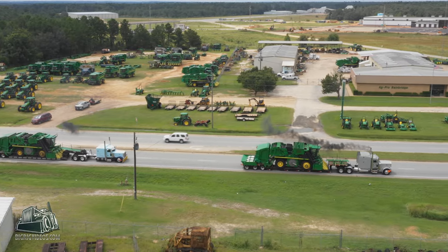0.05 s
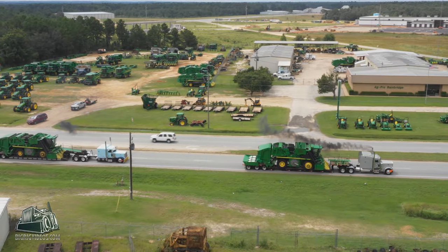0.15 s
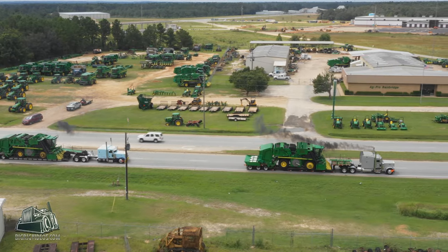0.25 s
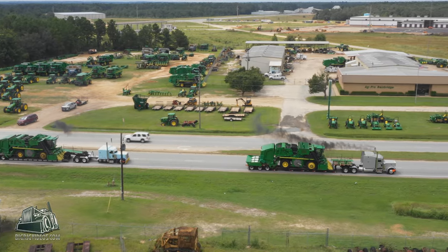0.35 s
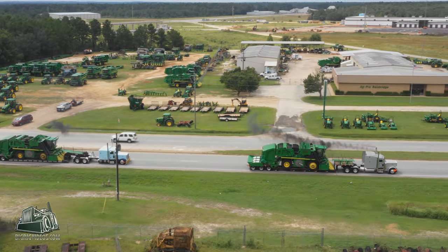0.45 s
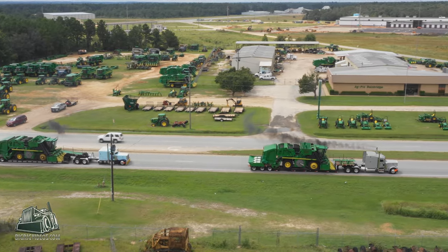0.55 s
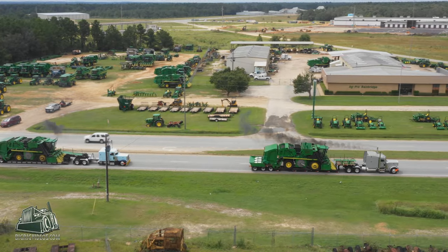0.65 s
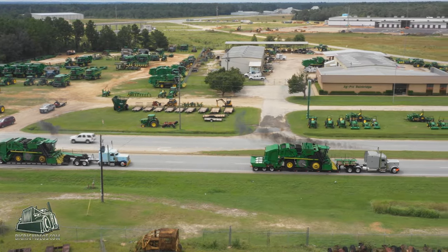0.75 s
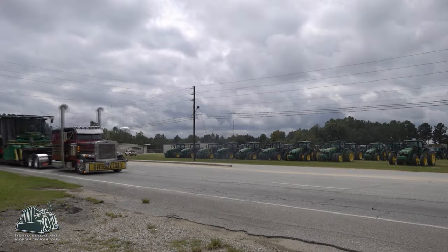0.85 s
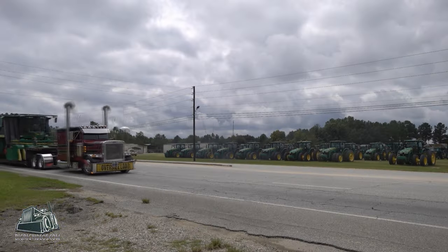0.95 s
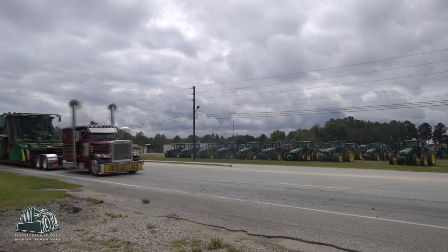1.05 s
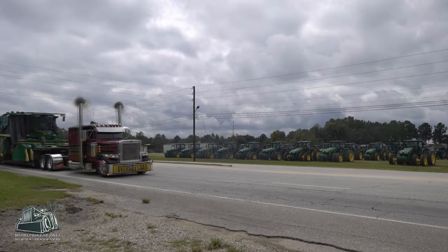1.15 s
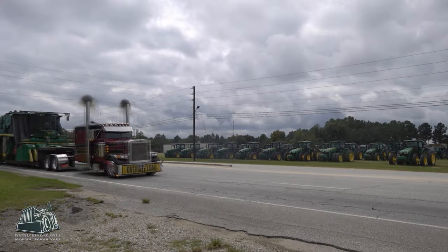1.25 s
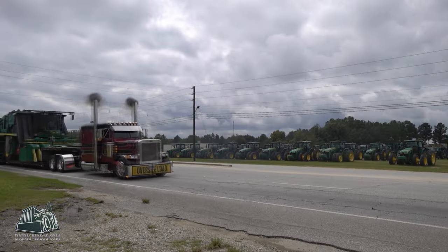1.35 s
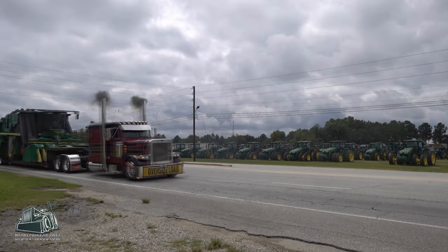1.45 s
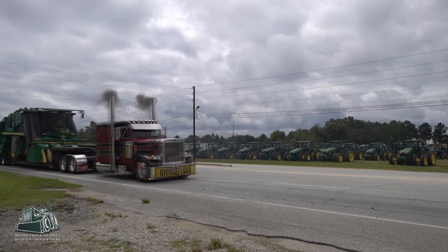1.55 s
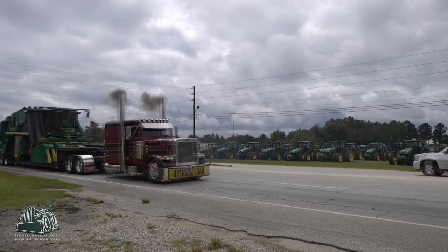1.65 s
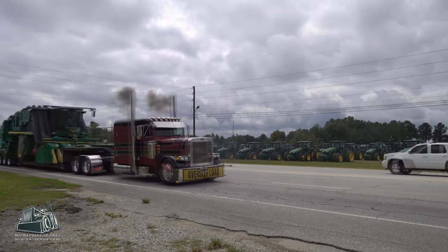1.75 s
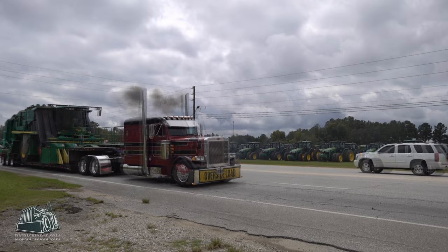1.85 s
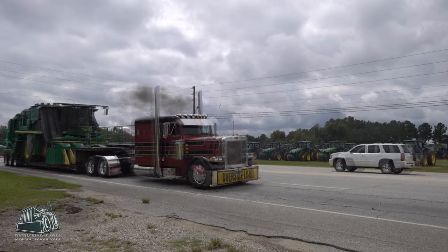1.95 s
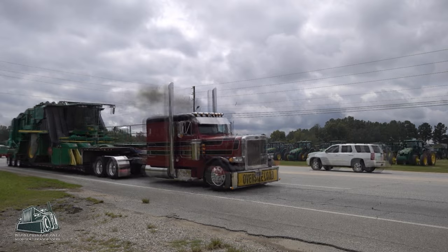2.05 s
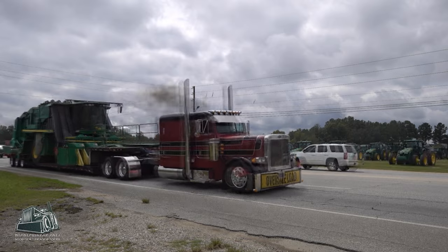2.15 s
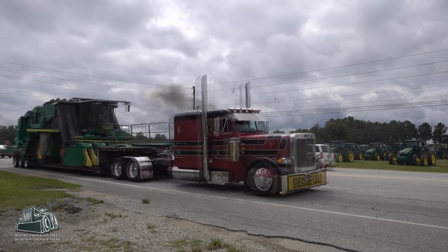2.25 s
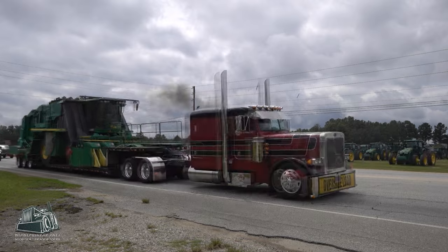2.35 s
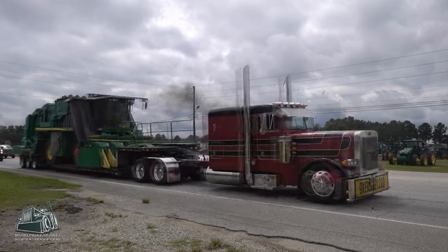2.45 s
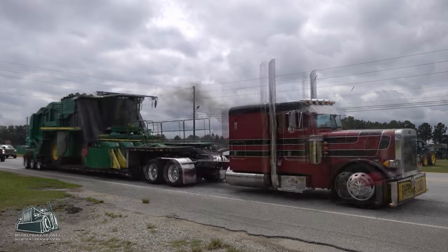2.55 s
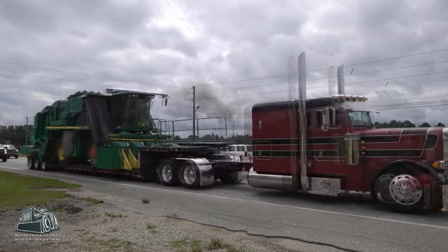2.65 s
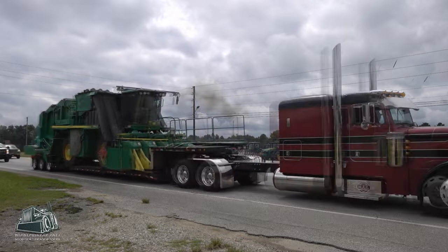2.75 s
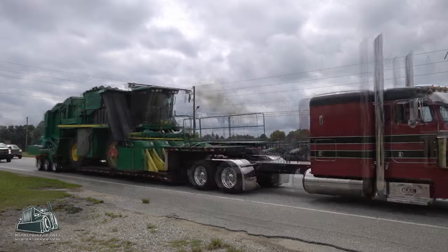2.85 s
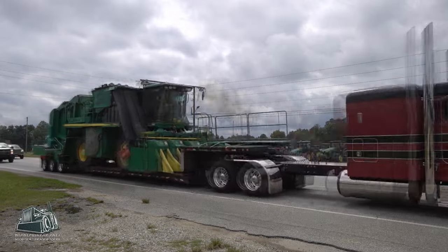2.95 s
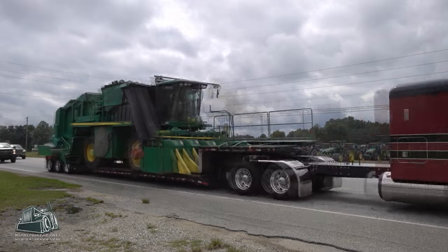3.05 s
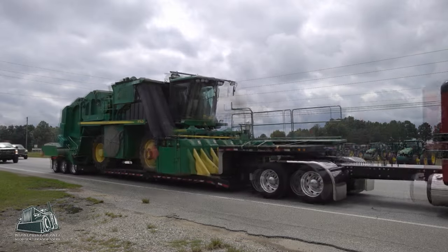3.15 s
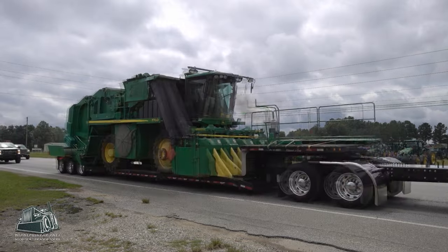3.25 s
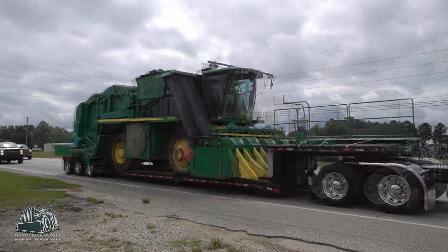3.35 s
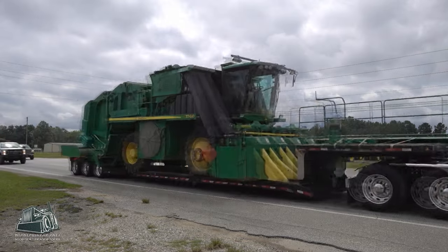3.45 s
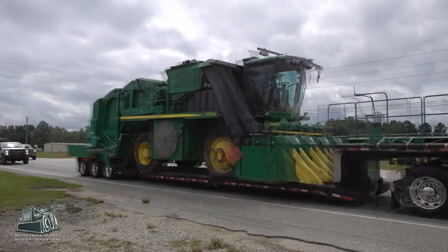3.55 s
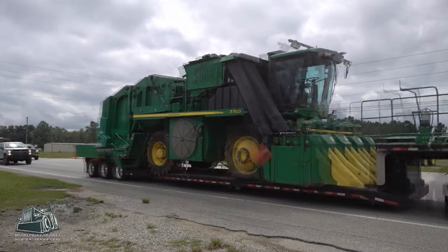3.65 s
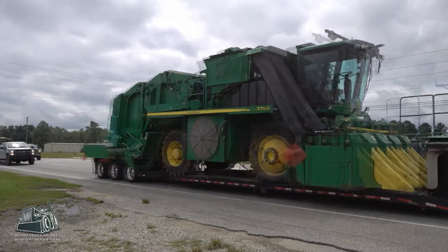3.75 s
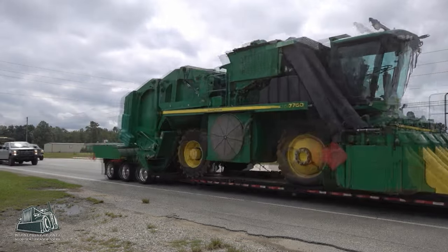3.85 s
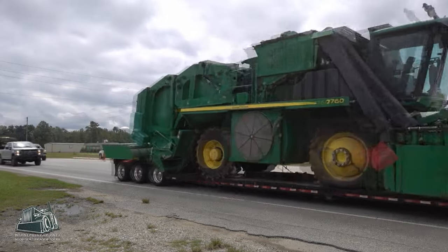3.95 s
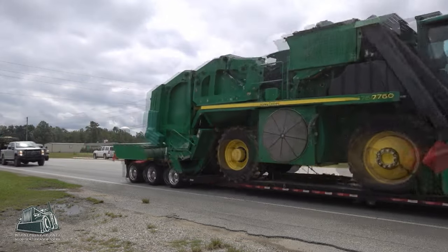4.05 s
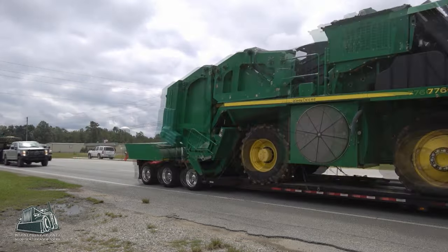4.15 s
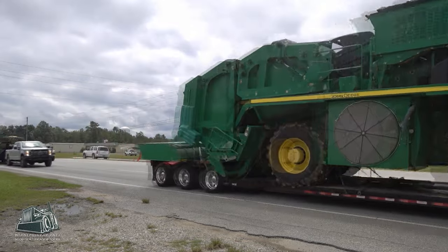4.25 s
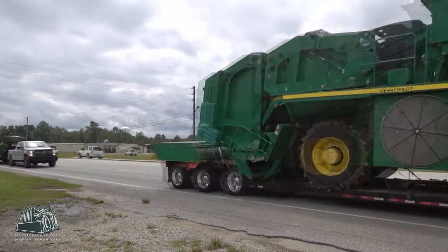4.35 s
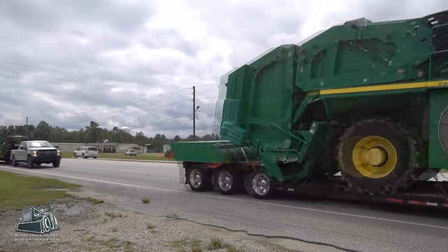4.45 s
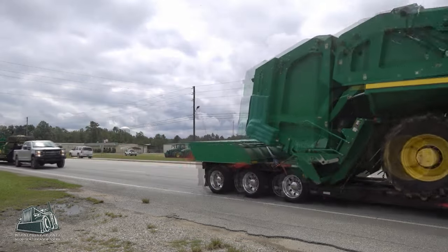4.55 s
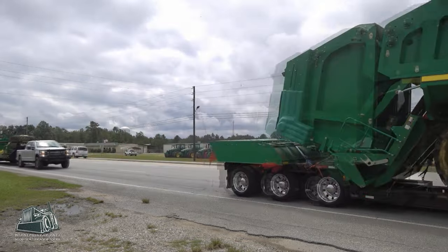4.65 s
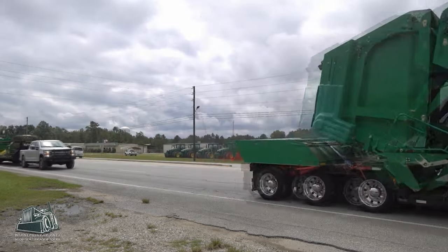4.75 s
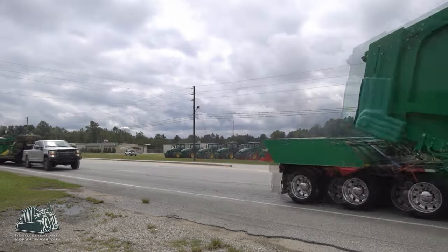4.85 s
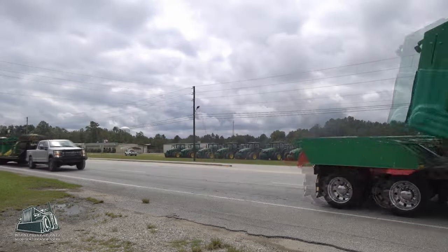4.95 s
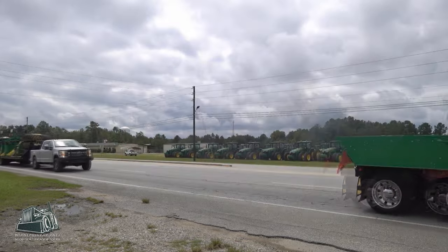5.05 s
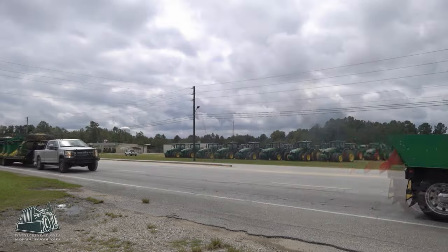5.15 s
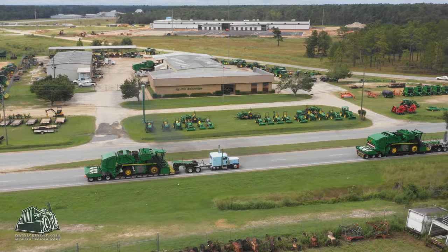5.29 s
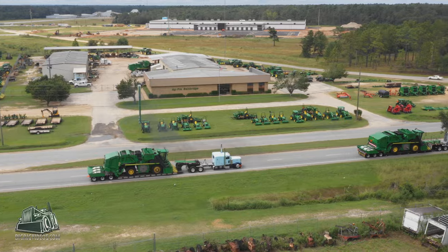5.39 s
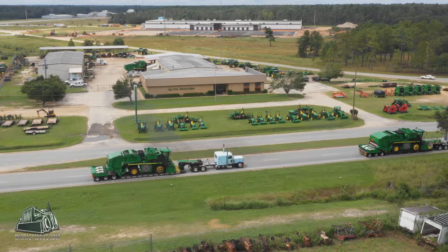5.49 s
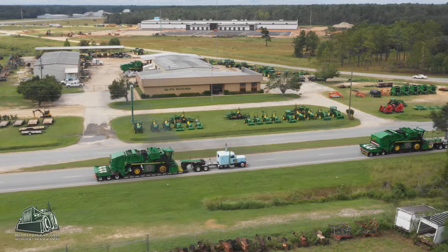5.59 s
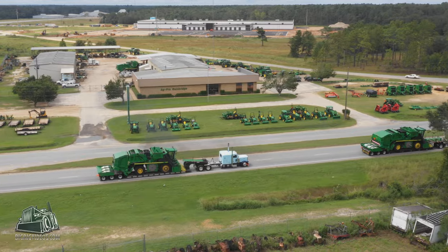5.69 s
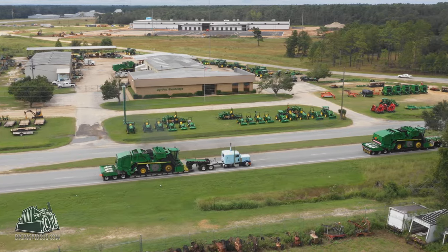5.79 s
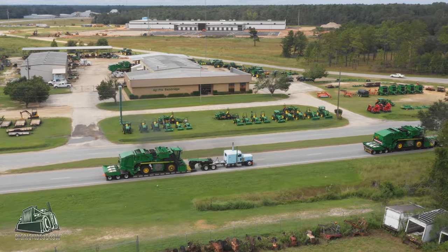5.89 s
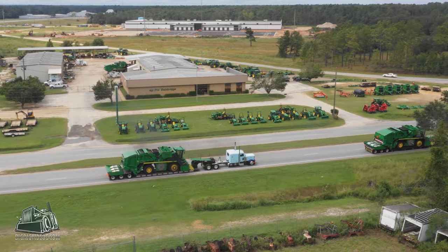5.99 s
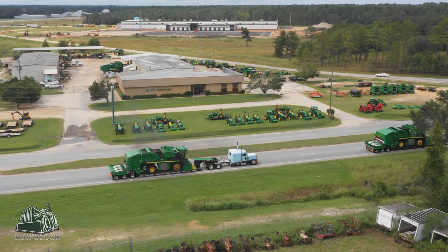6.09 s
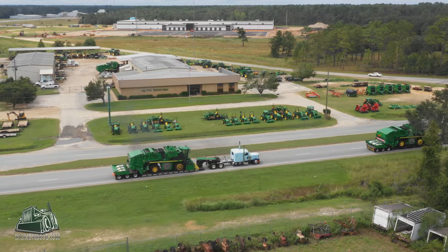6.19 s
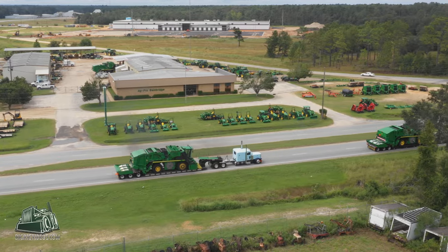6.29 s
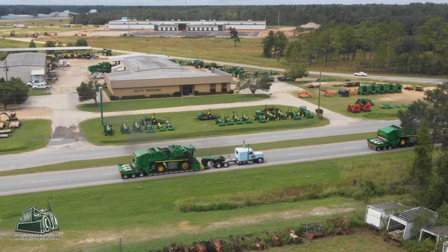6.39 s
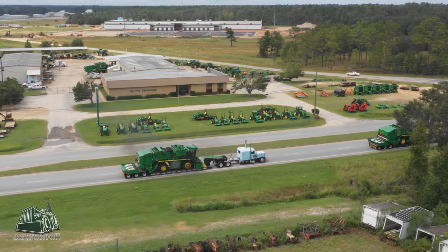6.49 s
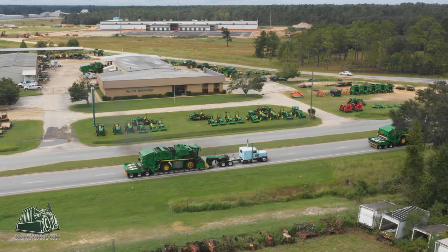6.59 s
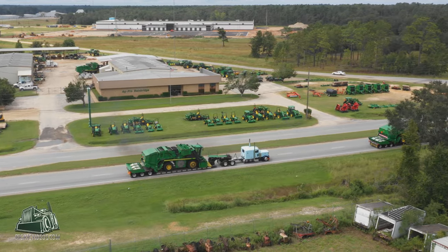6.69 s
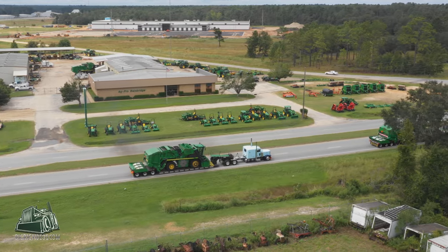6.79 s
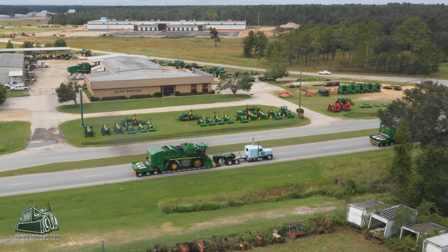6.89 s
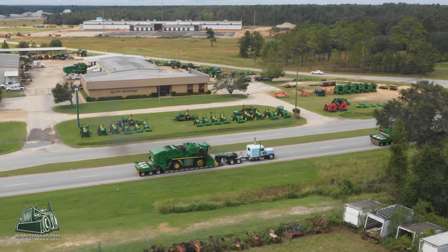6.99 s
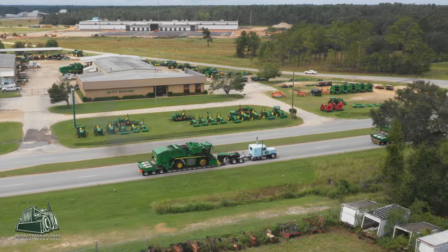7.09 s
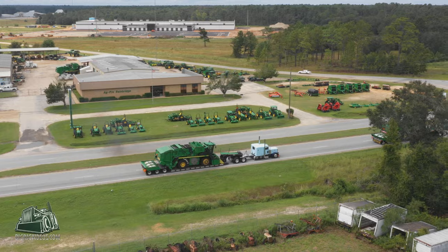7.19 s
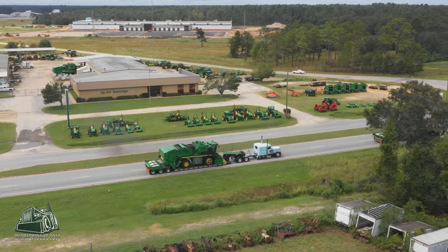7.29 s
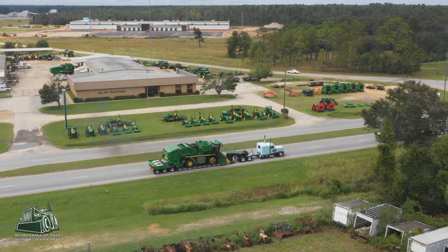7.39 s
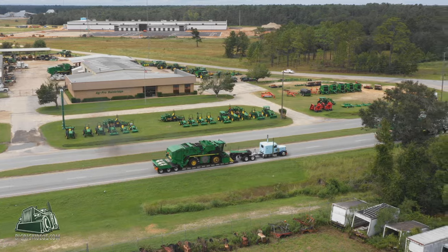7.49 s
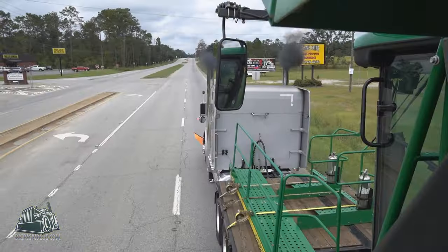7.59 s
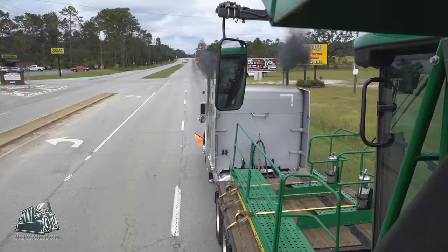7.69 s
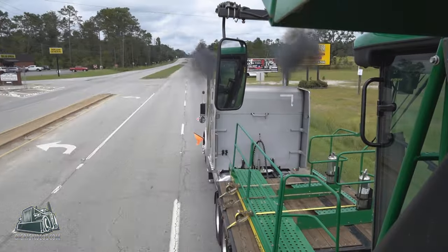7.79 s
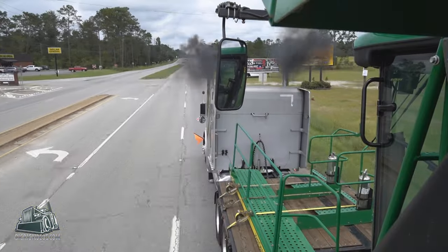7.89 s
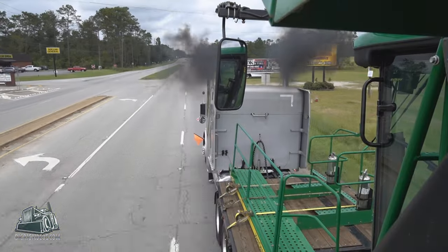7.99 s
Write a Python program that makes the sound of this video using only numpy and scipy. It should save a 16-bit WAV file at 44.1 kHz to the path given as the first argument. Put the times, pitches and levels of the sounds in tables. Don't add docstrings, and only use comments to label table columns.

```python
import sys
import numpy as np
from scipy import signal
from scipy.fft import rfft, irfft
from scipy.io import wavfile
from scipy.ndimage import uniform_filter1d

SR = 44100
rng = np.random.default_rng(int(sys.argv[2]) if len(sys.argv) > 2 else 0)


def waveform_to_disk(signal):
    frames = np.transpose(np.atleast_2d(signal))
    scaled = np.clip(frames, -1, 1) * 32767
    samples = np.round(scaled).astype(np.int16)
    wavfile.write(sys.argv[1], SR, samples)


def gain_from_db(level_db):
    decades = np.asarray(level_db, float) / 20
    return 10 ** decades


N = 354123
T = np.arange(N) / SR
HZ = np.maximum(np.arange(N // 2 + 1) * SR / N, 1)

# time in seconds, rate in Hz.
NEAR_SPEED = [(0, 63.18), (.4, 64.9), (.8, 66.25), (1.2, 68.23), (1.6, 69.47), (2, 70.97), (2.4, 72.31),
              (2.8, 73.15), (3.2, 73.32), (3.6, 73.86), (4, 73.59), (4.4, 73.75), (4.8, 74.79),
              (5.2, 74.91), (6, 76.9), (6.8, 78.5), (8, 80.6)]
LEAD_SPEED = [(0, 69.03), (.4, 69.73), (.8, 70.84), (1.6, 72.72), (2, 73.41)]
RIDDEN_SPEED = [(5.2, 66.58), (5.8, 71.05), (6.5, 73.9), (7.0, 77.33), (7.3, 80.9), (8.03, 85.95)]
# time in seconds, level in dB, lag of the second stack in ms,
# lag of the ground copy in ms.
NEAR_PATH = [(0.0, -32.5, 5.5, 11.7), (0.6, -28, 10.71, 12.9), (1.2, -23.5, 9.92, 11.9),
             (1.8, -21.5, 9.25, 11.23), (2.2, -19.5, 9.1, 10.26), (2.6, -20.5, 11.28, 9.36),
             (2.9, -16, 11.44, 8.33), (3.2, -11.5, 11.08, 7.32), (3.6, -16, 11.07, 8.08),
             (4.0, -16.5, 11.89, 7.88), (4.5, -15.5, 12.22, 7.56), (5.0, -21, 13.03, 8.33),
             (5.5, -22.5, 13.3, 8.71), (6.0, -25, 13.02, 8.88), (6.6, -27, 13.06, 8.62),
             (7.2, -31.5, 12.88, 9.4), (7.6, -27, 14.4, 8.4), (8.0, -26.5, 14.8, 8.4)]
LEAD_PATH = [(0.0, -24, 9.2, 1.75), (0.3, -20.5, 8.86, 2.58), (0.8, -20, 8.63, 2.65), (1.2, -26, 8.1, 2.3),
             (1.6, -34.5, 8, 1.9), (2.0, -27, 8.2, 2.2)]
RIDDEN_PATH = [(5.2, -50.5, 5, 2), (5.8, -41.5, 4.7, 2), (6.5, -38.5, 7.3, 1.9), (7.0, -31, 3.9, 3.3),
               (7.3, -34.5, 6.1, 1.9), (7.7, -32, 6.7, 2.1), (8.03, -36.5, 5.1, 2.1)]
NEAR_TONE = [(2.66, -8, -16), (0.46, 0.92)]
LEAD_TONE = [(-2.5, -1.5, -2.5), (.94, .93)]
RIDDEN_TONE = [(1.8, -1.3, -6), (0.74, 0.32)]
# multiple of the firing rate, level in dB.
UNEVEN = [(0.67, -11), (1.33, -8.5), (1.5, -4.5), (1.67, -9), (2.17, -9.5), (2.33, -4), (2.5, -10.5),
          (2.67, -2.5), (3.17, -7), (3.33, -14.5), (3.5, -8.5), (3.67, -16), (3.83, -5.5), (4.17, -11.5),
          (4.33, -3.5), (4.67, -18.5), (4.83, -6.5), (5.0, -10.5), (5.33, -4.5), (5.67, -6.5),
          (5.83, -14.5), (6.0, -14.5), (6.33, -8.5), (7.33, -10), (8.33, -12)]
LEAD_UNEVEN = [(1.5, -68), (1.83, -31.5), (2.17, -34.5), (2.67, -59), (3.17, -34.5), (3.33, -48.5),
               (4.33, -43), (5.0, -38.5), (6.0, -41.5), (7.0, -44.5)]

# loudest level in dB, nearest moment, approach time and departure time in seconds.
NEAR_PARTS = dict(low_side=(-27.5, 3.5, 1.35, 1.2), high_side=(-25, 4, 1.5, 1.5),
              trailer=(-23, 4, 1.5, 1.6), tyres=(-31.5, 3, 2, 1.5), block=(-43, 3, 1.4, 1.4),
              fan=(-52.5, 3, 0.7, 0.8))
# loudest level in dB, nearest moment in seconds, pass time in seconds.
LEAD_PARTS = [
    (-43, .4, 1.1),
    (-34.5, 1.0, 0.55),
    (-30.5, .9, 1.1),
    (-40.5, 1.4, .6),
    (-50, .02, 0.41),
    (-73.5, .02, .5),
]
TAIL_PARTS = [
    (-38, 6.25, 1.5),
    (-28.5, 5.84, 1.13),
    (-29.5, 5.6, 1.2),
    (-45.5, 6.2, 0.82),
    (-51.5, 5.2, .55),
    (-67.5, 5.1, .5),
]
# frequency in Hz, level in dB per Hz.
ROAR_COLOUR = [(16, -33.5), (32, -27.5), (62, -20), (125, -19), (260, -12.5), (540, -15), (1110, -22),
               (1460, -28.5), (1950, -27.5), (2450, -35.5), (4100, -45.5), (6800, -52.5), (10300, -63.5),
               (15600, -72.5)]
# frequency in Hz, width in Hz, level in dB.
ROAR_PEAKS = [(3160, 180, -2.5), (3730, 260, 3.5), (4330, 200, -2.5)]

# time in seconds, blade pitch in Hz, level in dB.
TURBO_NEAR = [(1.05, 6140, -71), (1.25, 6590, -63), (1.55, 7090, -65), (1.85, 7295, -58), (2.2, 7235, -53),
              (2.7, 7000, -50), (3.2, 6610, -43), (3.5, 6365, -52), (3.8, 6175, -45), (4.25, 6170, -60),
              (4.55, 6175, -58), (4.8, 6200, -51), (5.3, 6240, -57), (5.85, 6260, -72)]
TURBO_LEAD = [(0, 8010, -64), (.45, 7870, -66), (.6, 7790, -71), (.85, 7635, -62), (1.2, 7450, -69),
              (1.5, 7200, -69)]

# time in seconds, level in dB.
RIDE = [(5.2, -26), (5.55, -17), (5.85, -6.5), (6.4, 0.5), (6.85, 1.5), (7.1, 0), (7.45, 0), (7.7, -1),
        (8.03, 1.5)]
# level in dB at full ride, share of the ride curve it follows,
# gain in dB when the throttle opens.
RIDE_BANDS = [(-33.5, 0.17, -0.5), (-37.5, 0.47, 5.5), (-34, 0.98, -1), (-60.5, 1, 1)]
THROTTLE_S, THROTTLE_RISE_S = 7.7, 0.05
# frequency in Hz, level in dB per Hz.
RIDE_COLOUR = [(60, -36.5), (120, -6), (600, -19.5), (850, -6), (1460, -21), (2100, -11), (2900, -23),
               (5300, -27), (5900, -39), (7400, -39), (8000, -47.5), (10000, -53.5), (13500, -58.5),
               (15500, -58.5)]
# frequency in Hz, width in Hz, level in dB.
RIDE_PEAKS = [(802, 100, 3), (1180, 15, 5), (1700, 48, 7), (2040, 710, -2), (3550, 320, 6),
              (5000, 350, 8.5)]
RIDE_GAPS = [(5770, 130, -9), (6730, 90, -10), (7680, 90, -8)]
RIDE_TOP_HZ = 14300
# frequency in Hz, level difference in dB.
PORT_BALANCE = [(60, 10), (110, -10.5), (200, 2), (380, -3), (700, 0), (1290, 3.5), (2380, 4), (4400, -0.5),
                (8120, -0.5), (15000, 3)]
# frequency in Hz, phase lead in radians.
PORT_LEAD = [(60, 0), (860, -0.19), (1700, -0.23), (2330, -0.71), (5080, -0.57), (7000, -0.87),
             (11000, -0.37)]
PORT_ALIKE = 0.95
# time in seconds, level in dB.
WIND = [(5.2, -85), (5.45, -47), (5.8, -31), (6.2, -26), (6.6, -21.5), (6.9, -25), (7.2, -26.5),
        (7.75, -32), (8.0, -27.5)]
# time in seconds, level in dB, left minus right in dB.
POPS = [(5.735, -22.5, 8), (5.783, -27, -1), (5.817, -24, 4), (6.006, -23.5, 4), (6.096, -21, 8.5),
        (6.153, -21.5, -3), (6.195, -21, 8.5), (6.301, -22, 9), (6.4, -23, 11.5), (6.454, -18, 4),
        (6.566, -22, -0.5), (6.768, -16, 5), (6.836, -20.5, 0.5), (6.983, -25.5, -10.5), (7.028, -21, 2),
        (7.113, -26.5, 14), (7.225, -35.5, -4), (7.562, -24, 5), (7.64, -22, -4), (7.729, -21, 3),
        (7.809, -25.5, 15), (7.906, -21.5, -1.5)]
# frequency in Hz, level in dB per Hz.
PUFF = [(15, -12), (60, 0), (300, 0), (900, -9), (2500, -36), (6000, -70)]

# time in seconds, half length in seconds, level in dB.
SQUEALS = [
    (3.9, 0.58, -62.5),
    (5.054, .3, -73),
]
SQUEAL_HZ, SQUEAL_WIDTH_HZ = 10150, 490
IDLER_HZ, IDLER_DB = 45.1, -33
# time in seconds, level in dB.
CLICKS = [
    (0.2378, -27),
    (3.8582, -36.5),
    (5.2, -47.5),
    (5.3342, -49),
]
FADE_IN_S = 0.008


def curves(rows):
    s, *columns = np.transpose(rows)
    return [np.interp(T, s, column) for column in columns]


def on_hz(rows):
    hz, value = np.transpose(rows)
    return np.interp(np.log(HZ), np.log(np.maximum(hz, 1)), value)


def resonances(rows):
    return sum(db * np.exp(-((HZ - hz) / width) ** 2) for hz, width, db in rows)


def walk(rate):
    step = int(SR / rate)
    count = N // step + 2
    levels = np.clip(1.3 * rng.standard_normal(count), -2, 2)
    return np.interp(T, np.arange(count) * step / SR, levels)


def unit(x):
    return x / np.sqrt(np.mean(x ** 2))


def shaped(db):
    return rfft(rng.standard_normal(N)) * gain_from_db(db)


def living(spectra, colour_db, edges, levels_db, swell_db, flicker_db, rate):
    power_db = []
    for lo_hz, hi_hz in edges:
        inside = (HZ >= lo_hz) & (HZ < hi_hz)
        power_db.append(10 * np.log10(np.sum(gain_from_db(2 * colour_db)[inside]) * 2 / N))
    centres = np.log([np.sqrt(lo_hz * hi_hz) for lo_hz, hi_hz in edges])
    swell = walk(rate)
    out = 0
    for step in np.arange(20):
        place = np.log(20) + step * np.log(2) / 2
        shares = [np.interp(place, centres, row) for row in np.eye(len(edges))]
        db = sum(w * (level - p) for w, level, p in zip(shares, levels_db, power_db) if w > 0)
        distance = np.log2(HZ / 20) * 2 - step
        mask = np.cos(np.clip(distance, -1, 1) * np.pi / 2) ** 2
        noise = irfft(spectra * np.sqrt(mask), N)
        out = out + noise * gain_from_db(db + swell_db * swell + flicker_db * walk(9))
    return out


def bursts(times, db, decay_s, noise):
    kick = np.zeros(N)
    kick[(np.asarray(times) * SR).astype(int)] = gain_from_db(np.asarray(db))
    fall = np.exp(-1 / (decay_s * SR))
    return signal.lfilter([1], [1, -fall], kick) * noise


def engine(speed, path, tone, uneven, start, lag, low_db, high_db, wander_db):
    hz = curves(speed)[0]
    level_db, *lags_ms = curves(path)
    orders_db, strengths = tone
    turns = np.cumsum(hz) / SR + start
    firing = 0
    for k, db in enumerate((0, *orders_db), 1):
        comb = 1
        for strength, ms in zip(strengths, lags_ms):
            comb = comb * np.abs(1 + min(strength, 0.97) * np.exp(2j * np.pi * k * hz * ms / 1000))
        phase = k * turns + lag * k * (k - 1) / 2
        firing = firing + gain_from_db(level_db + db + 1.06 * walk(14)) * comb * np.cos(2 * np.pi * phase)
    side = 0
    for order, db in uneven:
        level = gain_from_db(db + (low_db if order < 4 else high_db) + wander_db * walk(2))
        phase = round(order * 6) / 6 * turns + rng.random()
        side = side + level * np.cos(2 * np.pi * phase)
    return np.sqrt(2) * firing, np.sqrt(2) * side, turns


def puffs(turns, depth, scatter_db):
    since = turns - turns[0]
    stroke = np.floor(since).astype(int)
    cylinder = rng.standard_normal(6)[stroke % 6]
    scatter = rng.standard_normal(stroke[-1] + 1)[stroke]
    size_db = scatter_db * np.clip(cylinder + scatter, -3, 1.6)
    return unit(1 + depth * gain_from_db(size_db) * np.sin(np.pi * since) ** 4)


def passing(top_db, nearest_s, approach_s, departure_s=None):
    pass_s = np.where(T < nearest_s, approach_s, departure_s or approach_s)
    return gain_from_db(2 * top_db) / (1 + ((T - nearest_s) / pass_s) ** 2) ** 2


def road_bounce(x, closest_s, pass_s, most_ms, share, dull_hz):
    late = most_ms / 1000 / np.sqrt(1 + ((T - closest_s) / pass_s) ** 2)
    dull = signal.sosfilt(signal.butter(1, dull_hz, fs=SR, output="sos"), x)
    return share * np.interp(T - late, T, dull)


def truck_body(side, turns, roar_db):
    colour = on_hz(ROAR_COLOUR) + resonances(ROAR_PEAKS)
    edges = [(25, 64), (250, 1200), (1000, 1720), (3000, 4160), (8500, 14000)]
    levels_db = [-40 + 0 * T] + [db - 3.0 for db in roar_db]
    roar = living(shaped(colour), colour, edges, levels_db, swell_db=0.5, flicker_db=0.28, rate=16)
    body = roar * puffs(turns, depth=0.45, scatter_db=2.5)
    body = body + road_bounce(body, 3.39, 0.777, 2.23, 0.27, 2200)
    return body + side + road_bounce(side, 3.426, 0.87, 2.46, 0.77, 3000)


def trucks():
    rows_by_part = zip(NEAR_PARTS.values(), LEAD_PARTS, TAIL_PARTS)
    parts_db = [10 * np.log10(sum(passing(*row) for row in rows)) for rows in rows_by_part]
    low_db, high_db, *roar_db = parts_db
    near, side, turns = engine(NEAR_SPEED, NEAR_PATH, NEAR_TONE, UNEVEN, start=-0.2194, lag=-0.091,
                               low_db=low_db, high_db=high_db - 0.8, wander_db=2.5)
    lead, lead_side, _ = engine(LEAD_SPEED, LEAD_PATH, LEAD_TONE, LEAD_UNEVEN, start=0.03, lag=0.31,
                                low_db=1, high_db=4, wander_db=1.5)
    lead = (lead + lead_side) * np.clip((2.4 - T) / 0.6, 0, 1)
    return gain_from_db(1.38) * near + lead + truck_body(side, turns, roar_db)


def turbo(rows, overtone_db, vane_db, blur):
    hz, db = curves(rows)
    turns = 2 * np.pi * np.cumsum(uniform_filter1d(hz, size=6000)) / SR
    live = uniform_filter1d(1.0 * (T > rows[0][0]) * (T < rows[-1][0]), size=4000)
    blade = np.sin(turns) * gain_from_db(4.3 * walk(25))
    blade = blade + blur * (walk(220) * np.sin(turns) + walk(220) * np.cos(turns))
    octave = gain_from_db(overtone_db) * (walk(420) * np.sin(2 * turns) + walk(420) * np.cos(2 * turns))
    vanes = 0
    for ratio in (1.3, 1.45, 1.62, 1.7):
        vanes = vanes + gain_from_db(4.0 * walk(2.7)) * walk(1300) * np.sin(ratio * turns)
    return np.sqrt(2) * live * gain_from_db(db) * (blade + octave + gain_from_db(vane_db) * vanes)


def turbos():
    lead = turbo(TURBO_LEAD, overtone_db=-40, vane_db=-30, blur=0.4)
    near = turbo(TURBO_NEAR, overtone_db=-24, vane_db=-19, blur=0.7)
    return gain_from_db(-0.5) * (lead + near)


def ride_roar():
    colour = on_hz(RIDE_COLOUR) + resonances(RIDE_PEAKS + RIDE_GAPS)
    colour = colour - 8 * np.clip((HZ - RIDE_TOP_HZ) / 600, 0, 1)
    half = gain_from_db(on_hz(PORT_BALANCE) / 2) * np.exp(0.5j * on_hz(PORT_LEAD))
    common = np.sqrt(PORT_ALIKE) * shaped(colour)
    apart = np.sqrt(1 - PORT_ALIKE) * shaped(colour)
    ports = np.array([(common + apart) * half, (common - apart) / half])
    ride_db = curves(RIDE)[0]
    throttle = np.clip((T - THROTTLE_S) / THROTTLE_RISE_S, 0, 1)
    levels_db = [db + share * ride_db + gain_db * throttle for db, share, gain_db in RIDE_BANDS]
    edges = [(600, 1600), (1500, 3260), (3000, 7700), (8000, 12800)]
    return living(ports, colour, edges, levels_db, swell_db=1.2, flicker_db=1.34, rate=30)


def wind():
    s, db, pan_db = np.transpose(POPS)
    ports = []
    for sign in (1, -1):
        gust = unit(irfft(shaped(on_hz(PUFF)), N))
        flap = bursts(s - 0.004, db + sign * pan_db / 2 + 3, 0.008, 1)
        flap = uniform_filter1d(flap, size=200)
        steady = gain_from_db(curves(WIND)[0] - 3.5 + 3.8 * walk(40))
        ports.append(gust * (flap + steady))
    return np.array(ports)


def trailer():
    firing, side, turns = engine(RIDDEN_SPEED, RIDDEN_PATH, RIDDEN_TONE, UNEVEN, start=0.091, lag=0.2,
                                 low_db=-43.5, high_db=-47.5, wander_db=3.5)
    motor = np.array([firing + side, np.roll(firing + side, -12)])
    roar = ride_roar() * puffs(turns, depth=0.38, scatter_db=6.5)
    return (roar + motor + wind()) * np.clip((T - 5.22) / 0.079, 0, 1)


def squeal():
    bell_db = -np.minimum(4.3 * ((HZ - SQUEAL_HZ) / SQUEAL_WIDTH_HZ) ** 2, 80)
    hiss = unit(irfft(shaped(bell_db), N))
    swell = sum(gain_from_db(db) * np.exp(-((T - s) / half_s) ** 2) for s, half_s, db in SQUEALS)
    return hiss * gain_from_db(2.5 * walk(22)) * swell


def idler():
    return np.sqrt(2) * gain_from_db(IDLER_DB + 0.8 * walk(3)) * np.sin(2 * np.pi * IDLER_HZ * T)


def ticks():
    s, db = np.transpose(CLICKS)
    colour = on_hz([(2000, -37), (3000, -2.5), (7000, 2), (11000, -18.5)])
    return bursts(s, db - 17.0, 0.004, unit(irfft(shaped(colour), N)))


def scene():
    roadside = trucks() + turbos() + squeal() + idler() + ticks()
    return (roadside + trailer()) * np.clip(T / FADE_IN_S, 0, 1)


def low_pass(x):
    return signal.sosfilt(signal.butter(12, 15640, fs=SR, output="sos"), x)


def record(dry):
    mix = np.tanh(0.56 * dry) / 0.65
    return low_pass(mix)


dry = scene()
out = record(dry)
waveform_to_disk(out)
```